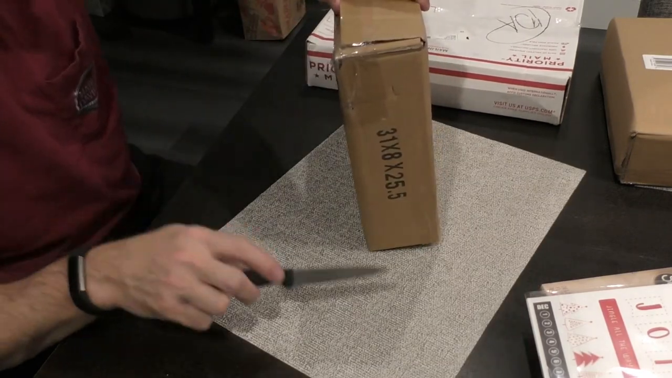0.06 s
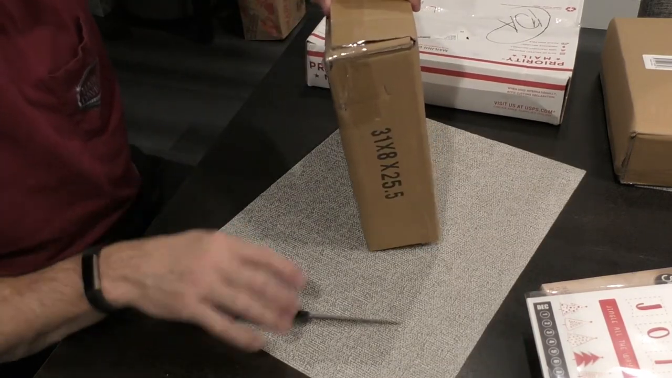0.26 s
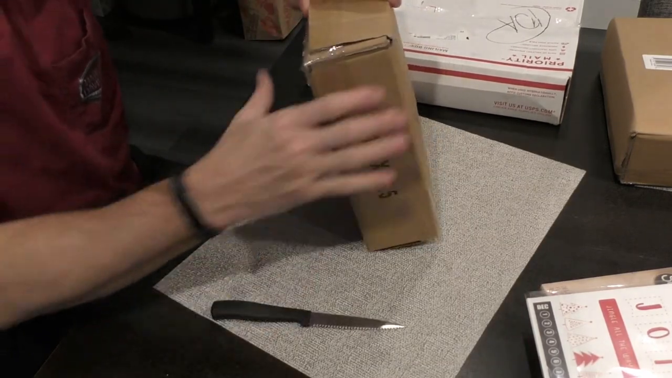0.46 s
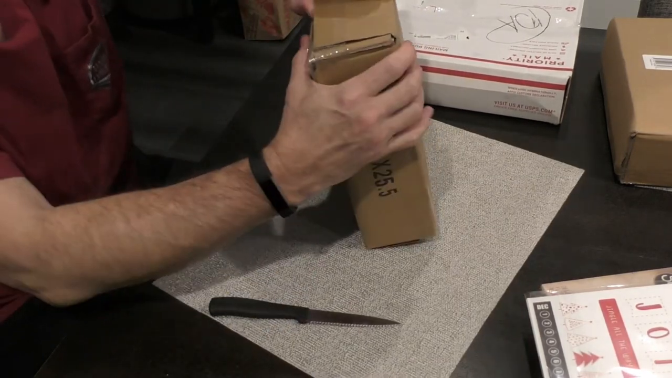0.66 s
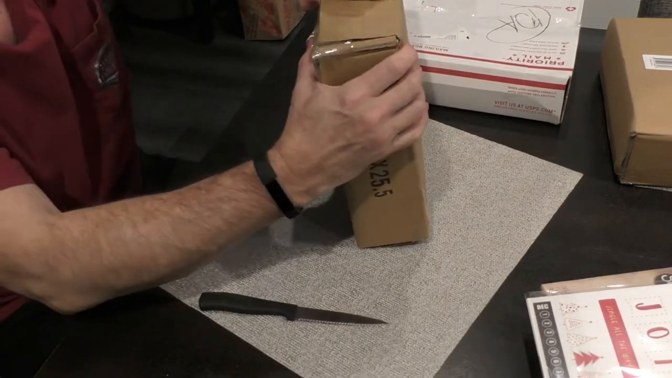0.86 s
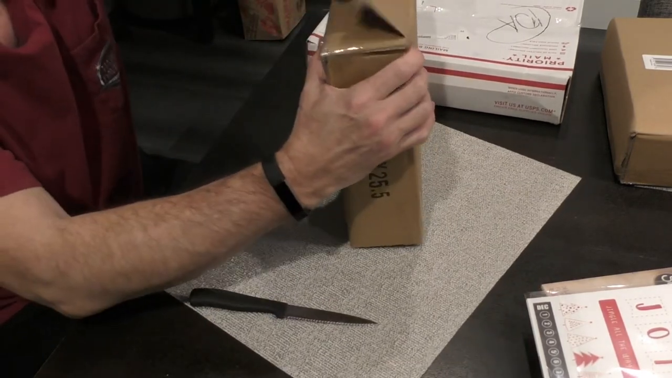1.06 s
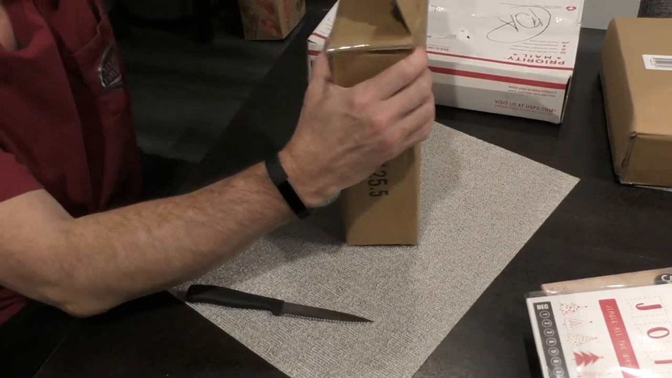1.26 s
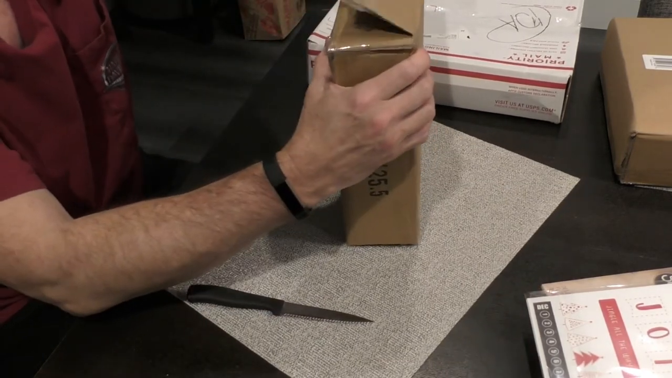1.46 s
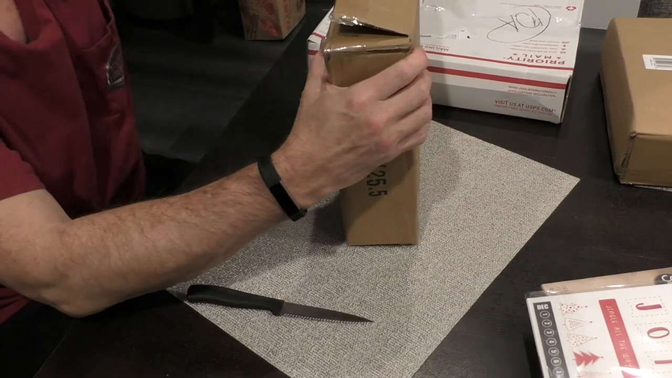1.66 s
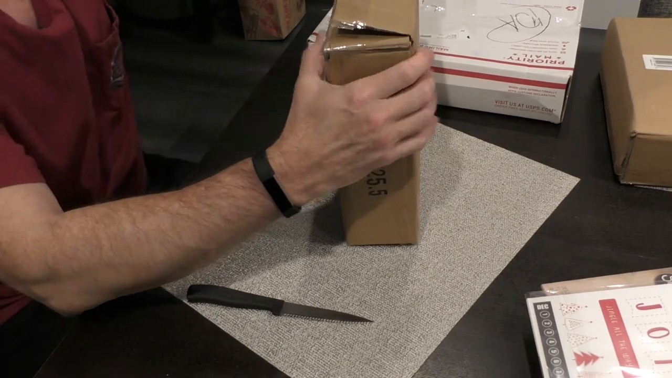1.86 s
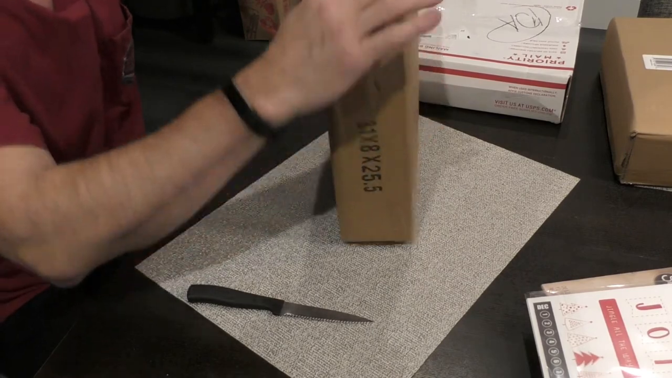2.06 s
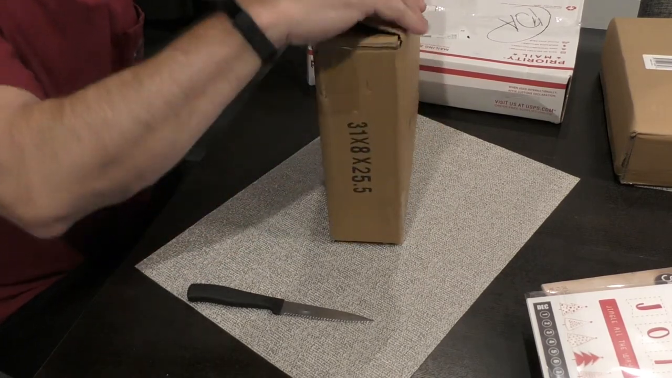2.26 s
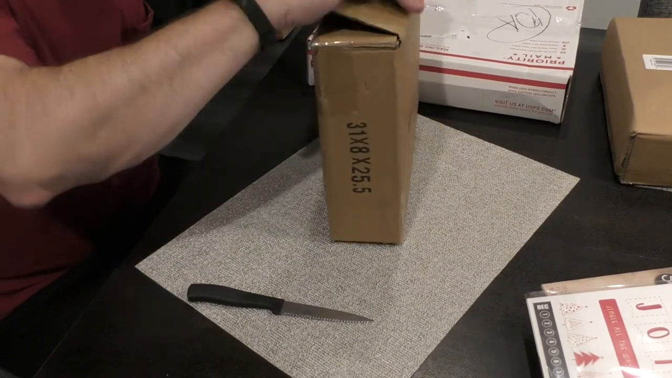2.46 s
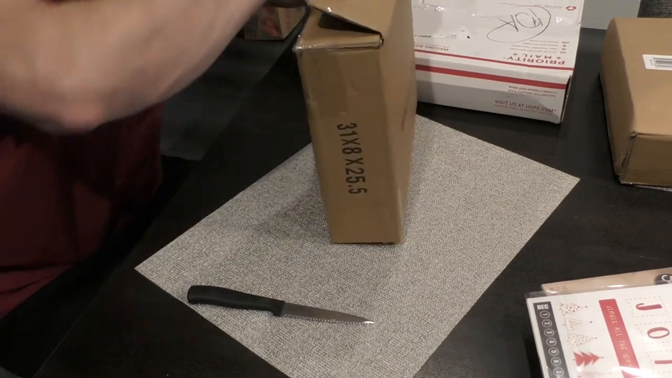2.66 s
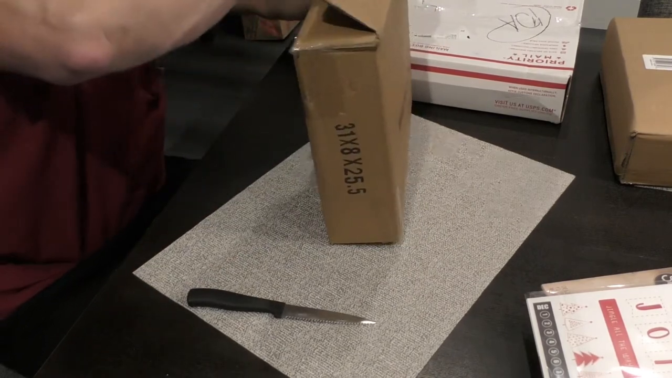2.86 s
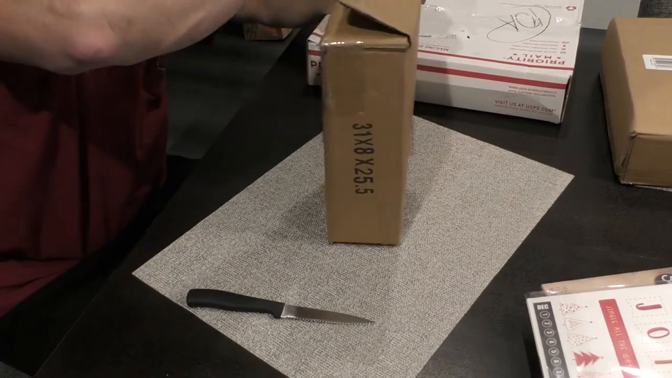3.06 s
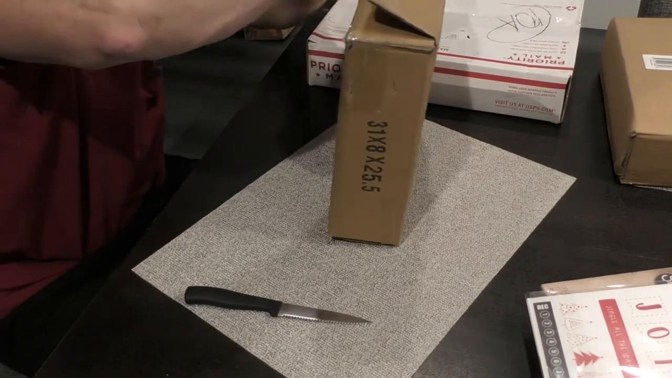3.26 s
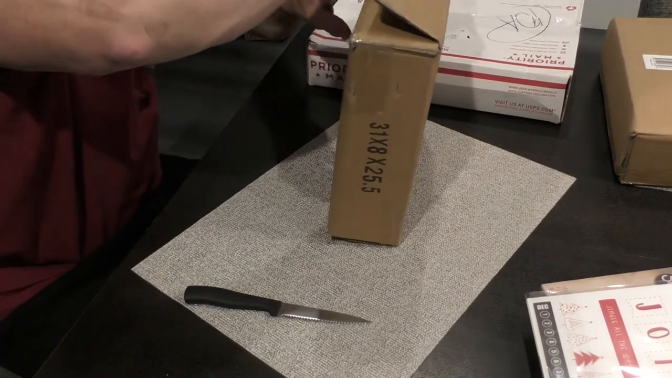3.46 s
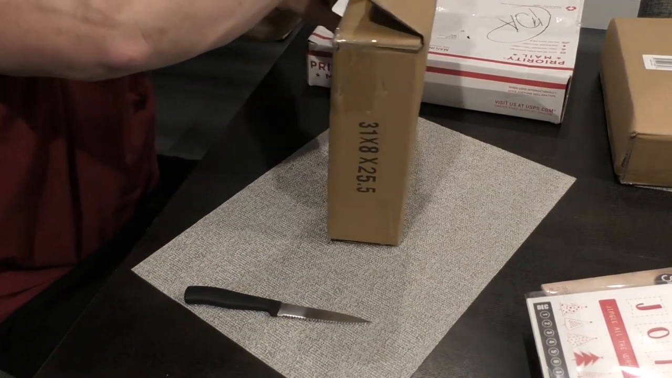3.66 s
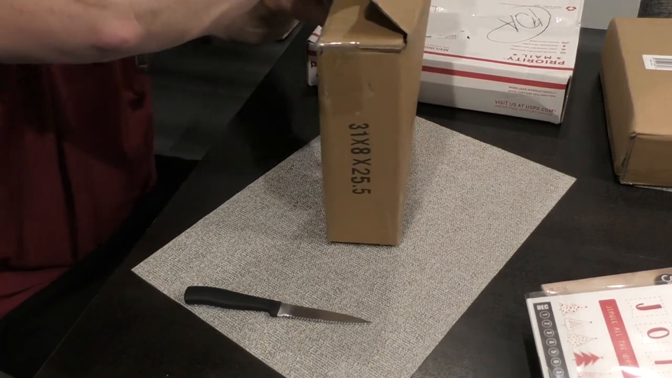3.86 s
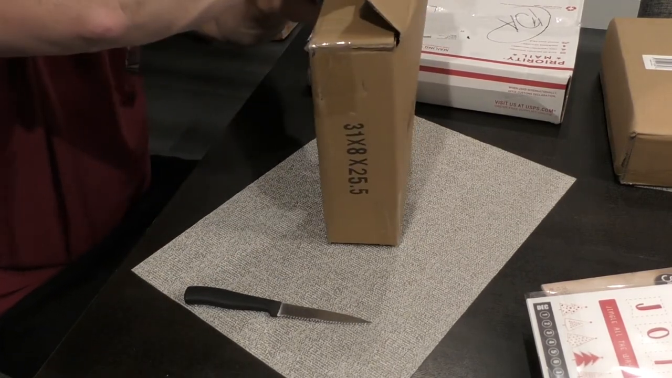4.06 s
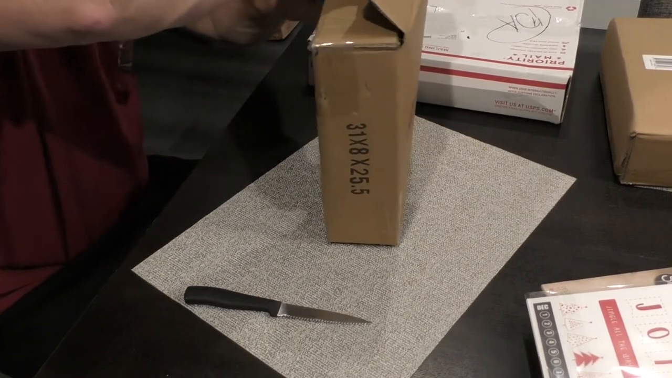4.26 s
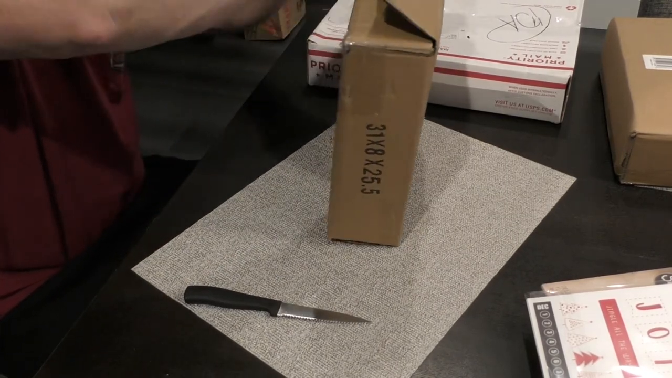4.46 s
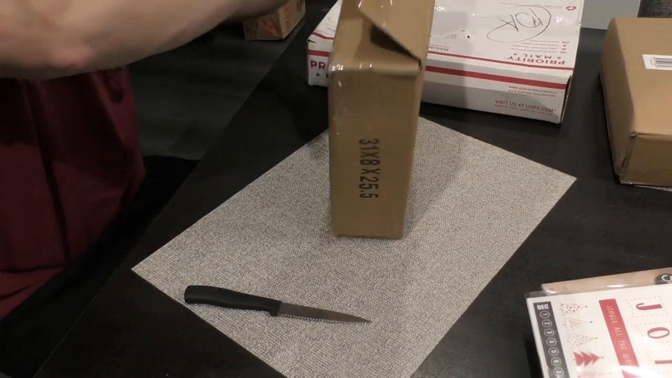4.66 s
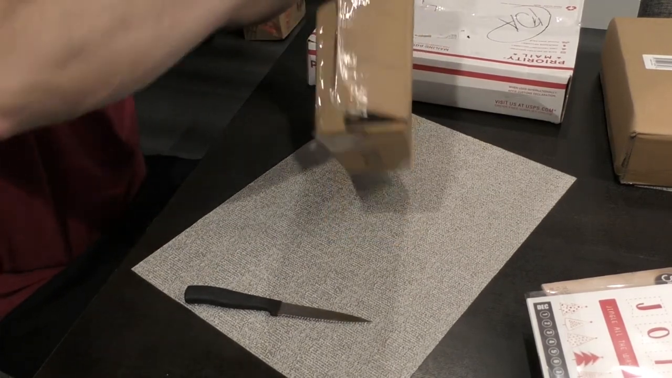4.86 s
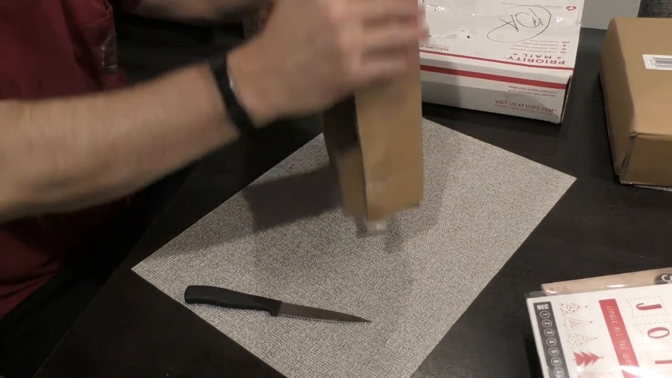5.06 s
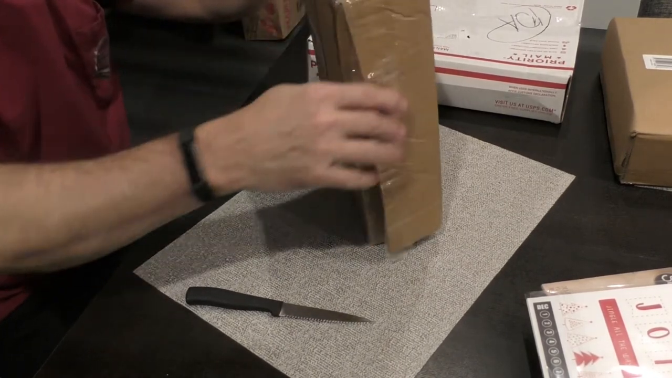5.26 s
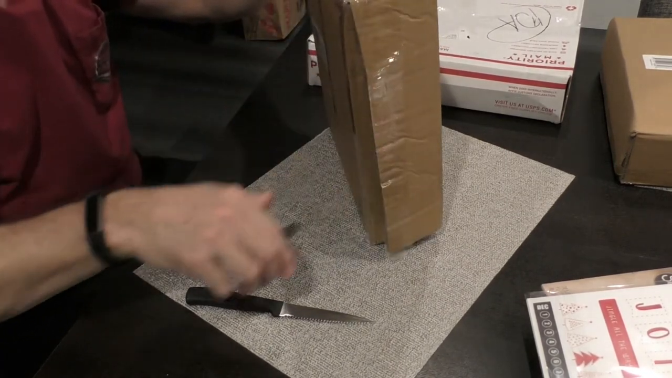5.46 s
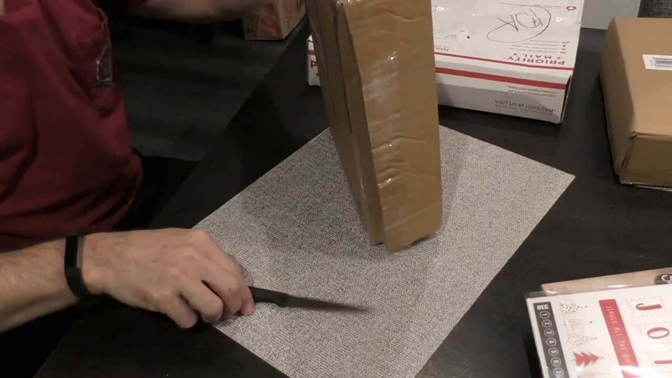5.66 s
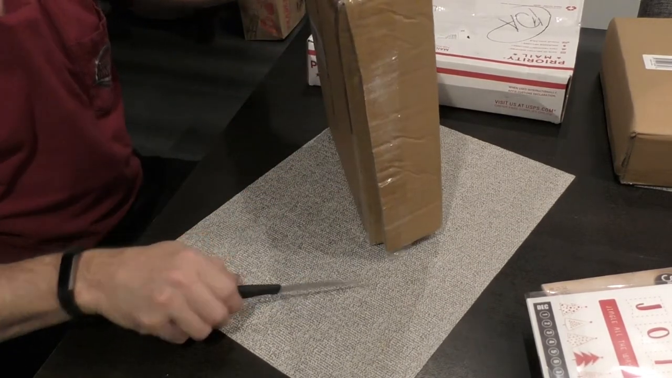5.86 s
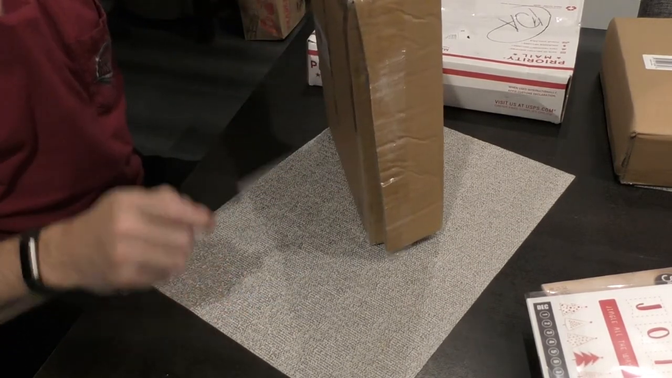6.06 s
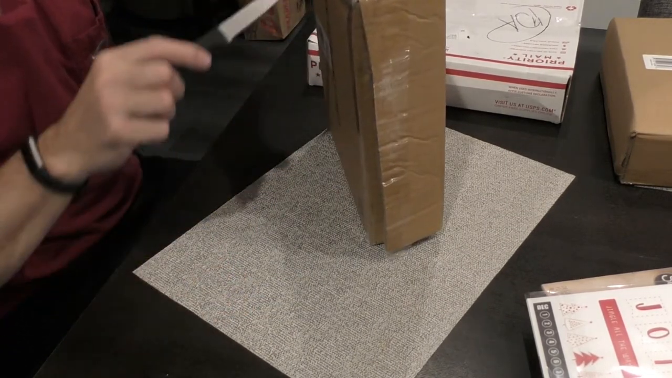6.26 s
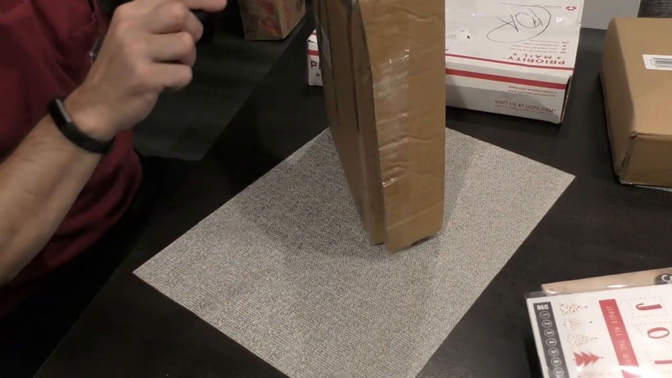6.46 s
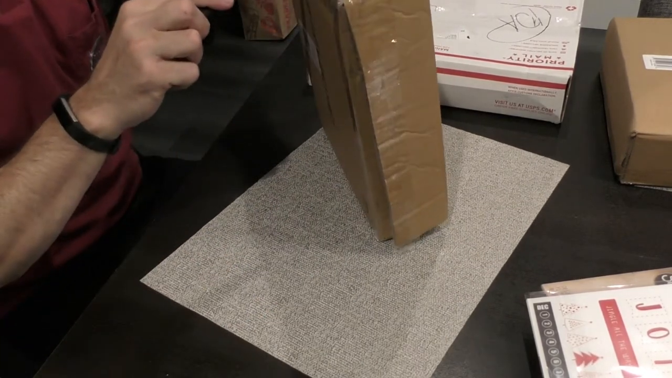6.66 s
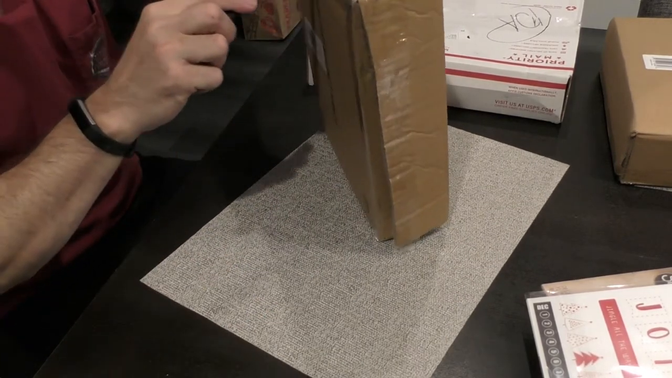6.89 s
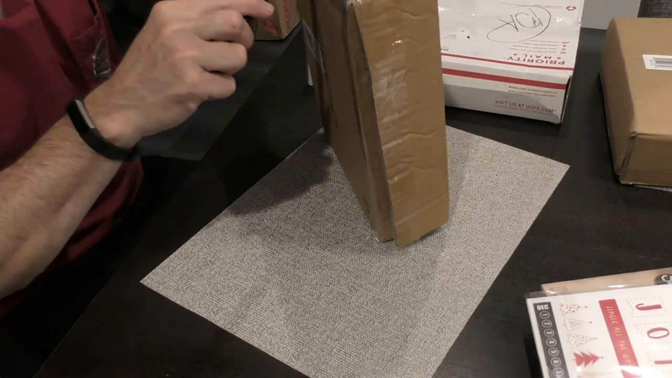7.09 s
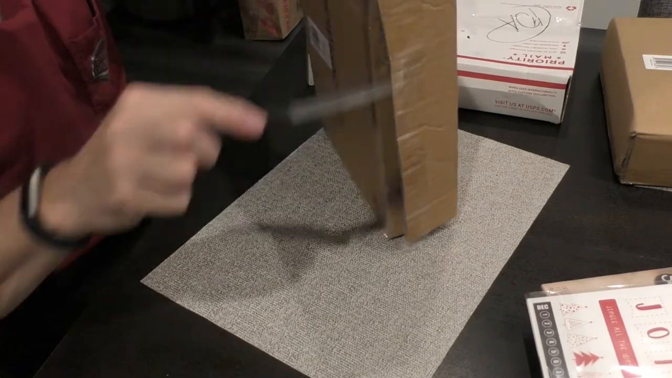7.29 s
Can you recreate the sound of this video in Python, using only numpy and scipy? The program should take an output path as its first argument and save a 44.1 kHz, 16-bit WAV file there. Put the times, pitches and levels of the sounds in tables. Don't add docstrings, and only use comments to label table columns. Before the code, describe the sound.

A hard knife clatter opens over faint room hum, followed by a loud cardboard crack as a box is gripped. Dry scrapes, tape crackle, small pops and dull hollow taps continue in uneven bursts. The box bumps down with a low woody ring, pauses slightly, then the knife bites and saws, ending in a loud, crisp rip. Close microphone, short indoor reverberation.

```python
import sys
import numpy as np
from scipy import signal
from scipy.io import wavfile
from scipy.ndimage import uniform_filter1d

SR = 44100
rng = np.random.default_rng(int(sys.argv[2]) if len(sys.argv) > 2 else 0)


def waveform_to_disk(signal):
    frames = np.transpose(np.atleast_2d(signal))
    scaled = np.clip(frames, -1, 1) * 32767
    samples = np.round(scaled).astype(np.int16)
    wavfile.write(sys.argv[1], SR, samples)


def gain_from_db(level_db):
    decades = np.asarray(level_db, float) / 20
    return 10 ** decades


N = 323253


def evened(x):
    return x / np.sqrt(np.mean(x ** 2) + 1e-20)


def read(points, hz):
    f, value = np.transpose(points)
    return np.interp(np.log(hz + 1), np.log(f + 1), value)


def add(mix, start_s, sound):
    part = mix[round(start_s * SR):][:len(sound)]
    part += sound[:len(part)]


def colour(x, spectrum, skirt_db=30):
    hz = abs(np.fft.fftfreq(8192, 1 / SR))
    octaves_beyond = abs(np.log2((hz + 1) / np.clip(hz, spectrum[0][0], spectrum[-1][0])))
    gain_db = np.maximum(read(spectrum, hz) - skirt_db * octaves_beyond, -100)
    log_gain = np.log(gain_from_db(gain_db))
    taps = np.fft.ifft(np.exp(np.conj(signal.hilbert(log_gain)))).real[:4096]
    return evened(signal.oaconvolve(x, taps)[:N])


def ring(x, hz, width_hz):
    r = np.exp(-np.pi * width_hz / SR)
    return signal.lfilter([1, 0, -1], [1, -2 * r * np.cos(2 * np.pi * hz / SR), r * r], x)


def friction(per_s, spread_db, smooth, gust_db):
    size = gain_from_db(spread_db * np.minimum(rng.exponential(1, N), 5)) * rng.choice([-1., 1.], N)
    clicks = evened(size * (rng.random(N) < per_s / SR))
    gusts = uniform_filter1d(rng.standard_normal(N), size=500)
    gusts = evened(uniform_filter1d(gusts, size=300))
    hiss = rng.standard_normal(N)
    return ((1 - smooth) * clicks + smooth * hiss) * gain_from_db(gust_db * gusts)


# frequency in Hz, level in dB.
AIR_SPECTRUM = [(20, -8), (63, 1), (270, 2.5), (550, -1.5), (1000, -6.5), (1400, -8.5), (1900, -13),
                (2800, -11), (3540, -13), (3900, -17), (4330, -8.5), (5200, -16.5), (15200, -31.5),
                (16500, -40)]


def still_air():
    level_db = np.where(np.arange(N) < KNOCKS[0][0] * SR, -49.5, -51)
    return gain_from_db(level_db) * colour(rng.standard_normal(N), AIR_SPECTRUM)


# frequency in Hz, t60 in seconds.
ROOM_T60 = [(150, 0.266), (1000, 0.075), (4000, 0.083), (12000, 0.087)]


def room(x):
    taps = np.zeros(SR // 2)
    at = np.arange(120, len(taps) - 20, 20)
    taps[at + rng.integers(0, 20, len(at))] = rng.choice([-1., 1.], len(at))
    hz, t, z = signal.stft(taps, SR, nperseg=256)
    decay = gain_from_db(-60 * t / read(ROOM_T60, hz)[:, None])
    tail = signal.istft(z * decay, SR, nperseg=256)[1]
    return signal.fftconvolve(x, tail / np.linalg.norm(tail))[:N]


# start in seconds, peak in dB, t60 in seconds.
THUMPS = [
    (2.18, -28.5, 0.27),
    (2.28, -30.5, 0.174),
    (5.211, -26, 0.445),
    (5.666, -36.5, 0.66),
    (6.59, -19, 0.19),
]
# frequency in Hz, level in dB, share of the thump's t60.
TABLE_MODES = [(132.82, 0, 0.963), (188.1, 2, 0.353), (376, -1, 0.325), (520, -10.5, 0.31),
               (737.4, -8.5, .4), (1055, -7.5, 0.39), (1301, -13.5, .4), (1600, -11, 0.31)]


def thumps():
    out, t = np.zeros(N), np.arange(SR // 2) / SR
    for start_s, db, t60_s in THUMPS:
        modes = sum(gain_from_db(mode_db - 60 * t / (share * t60_s)) * np.sin(2 * np.pi * hz * t)
                    for hz, mode_db, share in TABLE_MODES)
        add(out, start_s, gain_from_db(db) * np.minimum(t / 0.007, 1) * modes)
    return out


# time in seconds, level in dB.
ROCK = [
    (0.207, -21.5),
    (0.245, -38),
    (0.258, -17),
    (0.28, -25),
    (0.337, -18.5),
    (0.39, -25),
    (0.45, -31),
    (0.6, -45.5),
]
# frequency in Hz, level in dB.
MAT_SPECTRUM = [(60, -17), (200, -15), (312, 0.5), (460, -11.5), (684, 2.5), (800, -7), (940, 0.5),
                (1350, -8), (1750, -28), (2600, -45)]


def rocking():
    drone = colour(friction(900, spread_db=2, smooth=.6, gust_db=1.5), MAT_SPECTRUM)
    time_s, level_db = np.transpose(ROCK + [(ROCK[-1][0] + 0.029, -120)])
    return drone * gain_from_db(np.interp(np.arange(N) / SR, time_s, level_db, left=-120, right=-120))


def patchy(x, depth_db):
    z = signal.stft(x, nperseg=512)[2]
    field = rng.standard_normal(z.T.shape).T
    field = uniform_filter1d(field, size=8, axis=0)
    field = evened(uniform_filter1d(field, size=4, axis=1))
    return evened(signal.istft(z * gain_from_db(depth_db * field), nperseg=512)[1][:N])


def ticks(per_s, spread_db):
    size = gain_from_db(spread_db * np.minimum(rng.exponential(1, N), 4)) * (rng.random(N) < per_s / SR)
    kind = rng.integers(0, 8, N)
    out = np.zeros(N)
    for k, hz in enumerate(np.geomspace(1900, 7000, num=8)):
        once = ring(size * (kind == k), hz, .5 * hz)
        out += ring(once, hz, hz) * hz
    return evened(out)


def strokes(rows, lead_db_per_s, step_db, edge_s, drop_db, fade_db_per_s):
    t, power = np.arange(0, N, 64) / SR, 0
    for start_s, hold_s, db, coupled_db in rows:
        before = np.maximum(start_s + edge_s / 2 - t, 0)
        after = np.maximum(t - start_s - hold_s, 0)
        level_db = db + step_db * np.minimum(before / edge_s, 1) + lead_db_per_s * before
        level_db = level_db + drop_db * np.minimum(after / edge_s, 1) + fade_db_per_s * after
        power = power + gain_from_db(level_db + np.array([[0], [coupled_db]])) ** 2
    return np.array([np.interp(np.arange(N) / SR, t, p) for p in power])


# frequency in Hz, level in dB.
WALL_SPECTRUM = [(88, -47), (150, -11), (324, -4), (450, -7), (589, -3), (825, -10), (1500, -15.5),
                 (1950, -84.5), (3300, -120)]
RUMBLE_SPECTRUM = [(20, -9.5), (55, -3.5), (134, 0.5), (200, -5.5), (300, -22.5)]
SCRAPE_SPECTRUM = [(650, -9), (1100, -4), (1900, -6), (3000, -4), (4300, -14.5), (6000, -11), (9000, -39),
                   (15000, -72.5)]
FIZZ_SPECTRUM = [(3000, -17), (5000, 3), (7900, -9), (9300, -5.5), (12800, -9), (13400, -13.5),
                 (16000, -21.5)]
# start in seconds, hold in seconds, wall level in dB, table rumble in dB re wall.
GRIPS = [(.42, 0.098, -52, 9), (.635, 0.0323, -31.5, -19.5), (.72, 0.125, -37, -12),
         (.88, 0.0155, -39.5, -5.5), (.93, 0.0184, -31.5, -20.5), (.99, 0.0234, -30, -13),
         (1.1, 0.1323, -28, -17.5), (1.28, 0.172, -34.5, -17.5), (1.51, 0.0186, -27.5, -21),
         (1.705, 0.084, -42, -3), (2.02, 0.132, -41, -7.5), (2.13, 0.048, -35, -1), (2.22, 0.091, -42, -12),
         (2.48, 0.107, -35, -7), (2.6, 0.378, -41.5, -9), (3.0, 0.0724, -31.5, -17.5),
         (3.2, 0.069, -36.5, -17.5), (3.37, 0.021, -39.5, -7), (3.5, 0.0297, -38, -16.5),
         (3.64, 0.32, -39.5, -9.5), (3.99, 0.04, -34.5, -11), (4.16, 0.027, -32, -9),
         (4.28, 0.1436, -36, -13.5), (4.7, 0.028, -37, -15), (4.84, 0.087, -38, -3.5),
         (5.03, 0.0894, -36.5, -24), (5.21, 0.0586, -32, -6), (5.62, 0.134, -38.5, -13),
         (5.78, 0.077, -44, -10), (5.99, 0.0434, -38.5, -22.5)]
PRESSES = [
    (6.07, 0.184, -49, -19),
    (6.27, 0.0517, -40.5, -38),
    (6.36, 0.167, -43, -12),
    (6.53, 0.033, -31.5, -15),
    (6.572, 0.0217, -22, -13),
    (6.61, 0.0633, -31, -9.5),
    (6.96, 0.0983, -40, -3),
    (7.1, 0.093, -34.5, -10.5),
    (7.17, .04, -26, -25),
    (7.215, 0.068, -20, -25),
]
# start in seconds, hold in seconds, scrape in dB, tape fizz in dB re scrape.
SLIDES = [(.565, 0.0565, -45.5, -1), (.64, 0.03, -39, -13), (.68, .05, -46, -8), (.74, 0.118, -39.5, -10),
          (.887, .09, -39, -10), (.995, .045, -39, -9), (1.045, .02, -48, -10), (1.09, 0.12, -39, -18),
          (1.2, 0.2635, -37, -11), (1.47, .03, -44, -10), (1.525, 0.045, -36, -14), (1.58, .03, -44, -12),
          (1.7, 0.085, -49, -8.5), (1.79, 0.05, -49.5, -3), (1.85, 0.0545, -45.5, -3),
          (2.03, 0.181, -39, -9.5), (2.24, 0.18, -50, -7.5), (2.42, 0.069, -44, -6.5),
          (2.49, 0.1057, -36.5, -3), (2.61, 0.09, -38, -1), (2.7, .08, -38, 0), (2.8, 0.0854, -37, -13.5),
          (2.89, 0.116, -43.5, -10), (3.02, 0.152, -39.5, -3.5), (3.19, 0.1193, -44, -11.5),
          (3.37, 0.0447, -49, -12), (3.52, 0.0516, -47, -11), (3.64, 0.27, -42.5, -9.5),
          (3.84, 0.195, -41.5, -16.5), (4.06, 0.085, -48, -10.5), (4.18, 0.031, -40.5, -10),
          (4.28, 0.1745, -36, -11.5), (4.5, 0.176, -52.5, -16), (4.7, 0.091, -44.5, 0.5),
          (4.82, 0.1595, -37, -6.5), (5.02, 0.134, -45.5, -10), (5.225, 0.0706, -36.5, -9),
          (5.12, 0.066, -49, -12.5), (5.31, 0.0843, -52, 2.5), (5.61, 0.0426, -39.5, -10),
          (5.66, 0.063, -48, -8.5), (5.73, 0.038, -44, -4.5), (5.79, 0.061, -47, -5.5)]
CUTS = [(5.465, 0.0346, -44, -10.5), (5.51, 0.048, -49.5, -10), (5.958, 0.028, -50, -4),
        (5.99, 0.041, -46, 4.5), (6.06, 0.161, -54.5, -7), (6.26, 0.179, -53, -3), (6.548, 0.0483, -28, 1),
        (6.6, 0.0937, -39.5, -29.5), (6.958, 0.101, -43, -5), (7.08, 0.093, -38, -5.5),
        (7.15, .02, -33, -3), (7.175, 0.045, -24, -1), (7.225, .055, -23, -2)]


def rubbing():
    shared = friction(1500, spread_db=2.5, smooth=0, gust_db=1.5)
    body = 0.19 * shared + friction(900, spread_db=3.2, smooth=0.6, gust_db=1.8)
    wall = colour(patchy(body, depth_db=2), WALL_SPECTRUM)
    rumble = colour(friction(200, spread_db=3, smooth=.5, gust_db=2), RUMBLE_SPECTRUM)
    fine = .25 * shared + friction(4500, spread_db=2.9, smooth=.66, gust_db=1.8)
    fine = patchy(fine, depth_db=3)
    scrape = colour(fine, SCRAPE_SPECTRUM) + .42 * ticks(350, spread_db=3)
    fizz = colour(fine, FIZZ_SPECTRUM)
    pushed = strokes(GRIPS, lead_db_per_s=-140, step_db=-6, edge_s=0.0814, drop_db=-7.5, fade_db_per_s=-74.5)
    pushed += strokes(PRESSES, lead_db_per_s=-150, step_db=-8, edge_s=.02, drop_db=-10, fade_db_per_s=-80)
    slid = strokes(SLIDES, lead_db_per_s=-170, step_db=-9, edge_s=0.0111, drop_db=-9.5, fade_db_per_s=-120)
    slid += strokes(CUTS, lead_db_per_s=-170, step_db=-12.5, edge_s=0.0034, drop_db=-13.5, fade_db_per_s=-100)
    gains = np.sqrt(np.vstack([pushed, slid]))
    return (gains * (wall, rumble, scrape, fizz)).sum(axis=0)


# start in seconds, peak in dB, pitch in Hz.
KNOCKS = [(0.2069, -20.5, 431), (0.2514, 2.5, 1007), (0.932, -24.5, 283.5), (0.9586, -21.5, 304),
          (0.2535, -12, 1026), (1.0726, -10, 880), (1.0728, -1, 390), (1.2384, -12.5, 617.5),
          (1.512, -19.5, 1212), (1.7105, -19.5, 628), (1.7569, -21, 632), (2.1299, -16, 1023),
          (2.5362, -18, 620), (3.0663, -19.5, 1190), (3.4052, -29.5, 352), (3.5084, -23, 601),
          (3.642, -25, 367), (4.0027, -19, 600), (4.178, -22.5, 296.2), (4.8199, -24.5, 730),
          (4.8915, -19.5, 571), (5.0999, -11.5, 484), (5.2127, -10, 420), (5.63, -22, 387),
          (5.7545, -23.5, 963), (6.0885, -30.5, 461), (6.914, -36, 440), (6.9642, -21.5, 253.6),
          (7.279, -11, 561)]
HELD_KNOCKS = [(0.601, -30, 596), (0.638, -24.5, 248.7), (0.726, -24.5, 264), (0.764, -26.5, 288),
               (1.001, -18, 267.4), (1.31, -24, 537), (2.045, -29, 634), (3.529, -24.5, 627), (4.14, -29.5, 281),
               (4.185, -20.5, 271), (4.207, -25.5, 381), (4.296, -21, 261.3), (4.361, -22.5, 561),
               (4.602, -32, 533), (4.698, -30, 527), (5.954, -33, 223), (6.059, -31, 570), (6.116, -34, 519),
               (6.602, -15, 328), (6.982, -29, 201),
               (0.7961, -22, 331), (0.831, -22, 402), (0.8401, -20, 407), (0.8927, -13.5, 397),
         (1.0693, -14, 500), (1.0735, -9, 1230), (1.5444, -18, 289), (1.7193, -20, 495), (2.171, -8.5, 460),
         (2.858, -16, 416.7), (4.1113, -23, 560), (4.3087, -21, 481), (6.0177, -25, 475),
         (6.2929, -22, 528), (6.314, -20.5, 587), (6.4585, -18.5, 552), (6.4816, -18.5, 589),
         (6.5784, -10.5, 460.4)]
# start in seconds, peak in dB.
TEETH = [
    (6.3625, -29.5),
    (6.377, -26.5),
    (6.389, -26),
    (6.4, -23.5),
    (6.41, -22),
    (6.422, -22.5),
    (6.434, -22),
    (6.445, -22),
]


def knock_rows():
    free_t60_s, held_t60_s, tooth_hz = 0.0257, 0.0138, 571
    teeth = [row + (tooth_hz,) for row in TEETH]
    free = [row + (free_t60_s,) for row in KNOCKS]
    return free + [row + (held_t60_s,) for row in HELD_KNOCKS + teeth]


def knocks():
    out, t = np.zeros(N), np.arange(6000) / SR
    rows = knock_rows()
    draws = rng.uniform(-0.959, 1, (len(rows), 3))
    grit = rng.standard_normal((len(rows), len(t))) * gain_from_db(-24 - 60 * t / .004)
    modes = ((0.962, 5.0, 0.0028), (0.55, -3.5, 0.211), (1.463, 2.0, 0.254))  # (pitch factor, dB, scatter)
    sagging_t = t + 0.000738 * (1 - np.exp(-t / 0.000698))
    for (start_s, db, hz, t60_s), detune, contact in zip(rows, draws, grit):
        purity_db = -17.5 * max(np.log2(hz / 500), 0)
        wall = np.zeros(len(t))
        for (factor, mode_db, scatter), draw in zip(modes, detune):
            level_db = mode_db + (factor > 1) * purity_db - 60 * t * factor ** 0.51 / t60_s
            mode_hz = hz * factor * (1 + scatter * draw)
            wall += gain_from_db(level_db) * np.sin(2 * np.pi * mode_hz * sagging_t)
        wall = wall * np.minimum(t * hz / 1.103, 1)
        add(out, start_s, gain_from_db(db) * (wall / abs(wall).max() + contact))
    return out


# start in seconds, peak in dB, ring pitch in Hz.
SNAPS = [(0.328, -29.5, 3260), (0.9572, -17.5, 1780), (1.0096, -15.5, 2030), (1.2387, -4.5, 1630),
         (1.4765, -25.5, 3692), (1.5123, -15, 3450), (2.859, -19, 1960), (3.0732, -13.5, 5560),
         (3.2729, -18.5, 3550), (3.6655, -19.5, 3420), (3.6816, -19, 1800), (3.753, -22, 7000),
         (3.78, -24, 7000), (4.4214, -12, 3600), (4.8928, -14.5, 5500), (4.989, -20.5, 4478),
         (5.025, -17, 3330), (5.8062, -18, 4320), (6.013, -16.5, 3550), (6.0624, -22.5, 3978),
         (6.311, -21, 3670), (6.4343, -20, 9000), (6.5557, -6.5, 6900), (6.762, -21, 3370),
         (6.7622, -25.5, 11590), (7.074, -25, 4920), (7.083, -20, 3720), (7.261, 1, 7440),
         (7.271, -5.5, 1910)]
CLICKS = [(0.2079, -12, 4800), (0.2081, -12, 2200), (0.2764, -37, 4000), (0.318, -32, 5030),
          (0.344, -21, 4670), (0.379, -26.5, 5040), (1.2499, -15, 5400), (1.545, -11.5, 3830),
          (1.554, -9.5, 2290), (1.6692, -23, 4000), (1.712, -19, 2650), (4.43, -8.5, 2190),
          (2.1495, -17.5, 2320), (3.023, -15.5, 4190), (3.43, -28.5, 4100), (3.4541, -16.5, 2350),
          (3.481, -12.5, 3050), (3.535, -23.5, 3080), (3.5446, -13, 2550), (3.6106, -21, 4500),
          (4.3959, -9, 3000), (4.78, -26, 3180), (5.0388, -12, 3170), (5.48, -21, 5500),
          (5.4803, -22, 1900), (5.607, -24.5, 3340), (5.6865, -22, 3660), (5.9919, -19, 3750),
          (6.0922, -23.5, 4230), (6.2737, -15.5, 3270)]
CREASES = [(0.2516, -4, 1200), (0.3951, -15.5, 1270), (1.0684, -19, 2580), (1.0723, 5.5, 1990),
           (1.0729, -1, 2700), (1.318, -13, 4180), (1.531, -10.5, 3680), (1.999, -9, 1550),
           (2.173, -9.5, 2880), (2.179, -14.5, 2190), (2.2605, -13.5, 3340), (2.9634, -20.5, 1850),
           (3.0336, -14, 2800), (3.284, -17, 4000), (3.2881, -13, 2840), (4.113, -22.5, 2270),
           (4.179, -11, 2940), (4.8876, -4.5, 2450), (5.0696, -15.5, 3170), (5.1011, -10, 1560),
           (5.2106, -8, 1620), (5.2118, -15, 2500), (5.5231, -16.5, 3100)]
CRUNCHES = [
    (1.375, -15, 1670),
    (1.7574, -27, 2980),
    (2.535, -16, 1720),
    (3.5616, -21, 3220),
    (5.6283, -17, 3290),
    (5.7563, -24, 2030),
    (6.5761, -8, 3170),
    (6.9618, -27.5, 1550),
]
POPS = [(.406, -32, 5500), (.6674, -32, 9500), (.7344, -35, 9500), (.9453, -24, 3400), (.9984, -21, 3400),
        (1.0174, -25, 3470), (1.0294, -24, 3500), (1.1967, -25, 2430), (1.2124, -23, 5400),
        (1.2734, -24, 5000), (1.3274, -26, 4000), (1.3444, -27, 6500), (1.4411, -23, 3640),
        (1.5704, -21, 4800), (1.6372, -32, 3650), (1.6984, -35, 6000), (1.9809, -36, 5000),
        (2.1076, -27, 6700), (2.1994, -27, 5800), (2.5114, -24, 3030), (2.5187, -20, 2000),
        (2.5661, -20, 1800), (2.578, -20, 2200), (2.8124, -29, 8000), (2.8434, -25, 9000),
        (3.1393, -24, 2500), (3.3044, -30, 4200), (3.3852, -31, 2230), (3.4057, -31.5, 3800),
        (3.4604, -27, 2200), (3.6484, -33, 7000), (3.7014, -28.5, 5000), (3.8511, -25, 4000),
        (4.0174, -27, 4500), (4.1004, -32, 7000), (4.1854, -22, 2000), (4.2093, -30, 3440),
        (4.2961, -25, 2200), (4.3655, -21, 3180), (4.4474, -22, 2580), (4.6044, -34, 1600),
        (4.6124, -35, 6000), (4.6643, -29, 4000), (4.8199, -20.5, 2600), (4.8414, -21, 3000),
        (4.9556, -23, 4290), (4.9654, -22, 4160), (4.9841, -23, 1800), (5.0304, -24, 6000),
        (5.7424, -25, 4290), (5.7684, -30, 4500), (6.1464, -32, 3190), (6.2467, -32.5, 3620),
        (6.34, -30, 2400), (6.6643, -22, 2200), (6.7027, -26, 3510), (6.7124, -28, 3000),
        (6.9012, -42, 6000), (6.9162, -38, 2500), (7.0045, -29, 5500)]
# top end in dB re peak, t60 in seconds, ring width re pitch, share of broad snap.
CRACK_KINDS = [
    (-13.5, 0.00765, 0.462, 0.73),
    (-25.5, 0.0071, 0.252, 0.5),
    (-27.5, 0.00559, 0.37, 0.296),
    (-14.5, 0.0168, 0.257, 0.69),
    (-19, 0.0051, 0.348, 0.314),
]


def crack_rows():
    tick_db, tick_hz = -11.5, 2000
    teeth = [(start_s, db + tick_db, tick_hz) for start_s, db in TEETH]
    tables = SNAPS, CLICKS, CREASES, CRUNCHES, POPS + teeth
    return [row + tuple(kind) for table, kind in zip(tables, CRACK_KINDS) for row in table]


def cracks():
    out, t = np.zeros(N), np.arange(1500) / SR
    wide = signal.butter(1, [1100, 6000], "band", fs=SR)
    top = signal.butter(2, [5500, 12500], "band", fs=SR)
    for start_s, db, hz, top_db, t60_s, width, share in crack_rows():
        rise_s = .13 * t60_s
        burst = rng.standard_normal(len(t))
        first_break = abs(t - rise_s) < 1.2 / SR
        burst = burst + .9 * np.sign(burst) * first_break
        burst = burst * gain_from_db(-60 * t / t60_s) * np.minimum(t / rise_s, 1) ** 2
        patch = ring(burst, hz, width * hz)
        snap = signal.lfilter(*wide, burst)
        tick = signal.lfilter(*top, burst)
        dull = signal.butter(3, max(6800, 1.3 * hz), fs=SR)
        patch = signal.lfilter(*dull, evened(patch) + share * evened(snap))
        crack = patch / abs(patch).max() + gain_from_db(top_db + 5.5) * tick / abs(tick).max()
        add(out, start_s - .0006, gain_from_db(db + 1.2) * crack)
    return out


def scene():
    hits = cracks() + knocks()
    near = hits + thumps() + rubbing() + rocking()
    near = near + .2 * np.roll(near, shift=24)
    wet = signal.lfilter(*signal.butter(1, 3000, fs=SR), room(np.tanh(hits)))
    return (near + gain_from_db(-15.5) * wet + still_air())[None]


def band_limit(x):
    return signal.sosfilt(signal.butter(12, 16840, fs=SR, output="sos"), x)


def record(dry):
    heard = signal.lfilter(*signal.butter(2, 44, "high", fs=SR), dry)
    squeezed = heard / (1 + abs(heard) ** 4) ** (1 / 4)
    edge = signal.firwin(255, 16050, window=("kaiser", 5), fs=SR)
    return band_limit(signal.oaconvolve(squeezed, edge[None], "same"))


dry = scene()
out = record(dry)
waveform_to_disk(out)
```